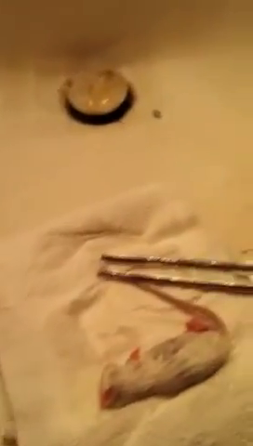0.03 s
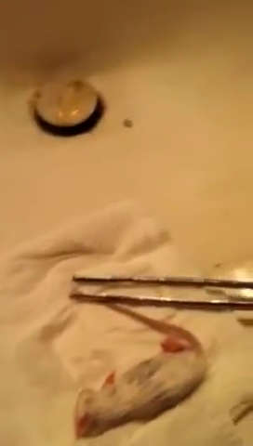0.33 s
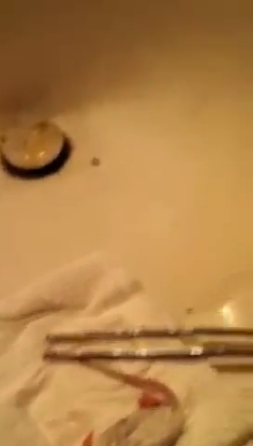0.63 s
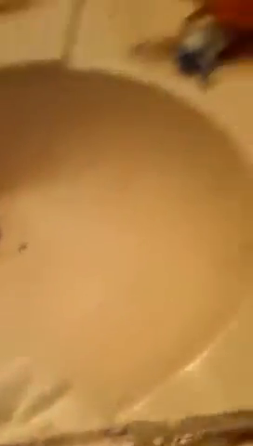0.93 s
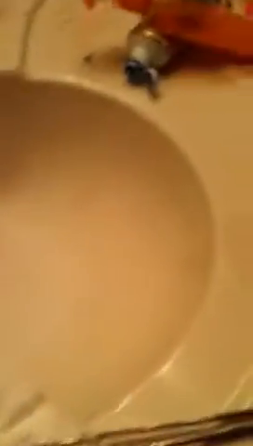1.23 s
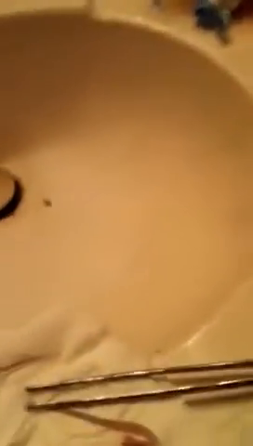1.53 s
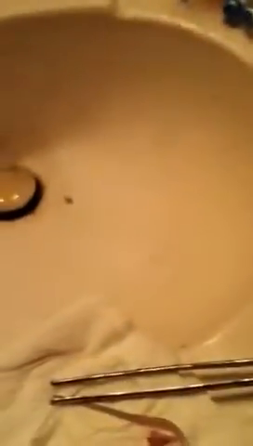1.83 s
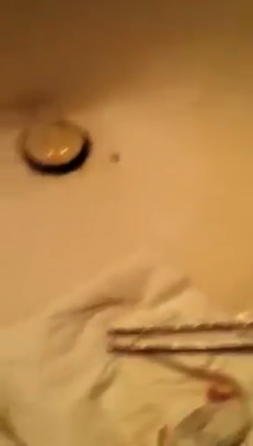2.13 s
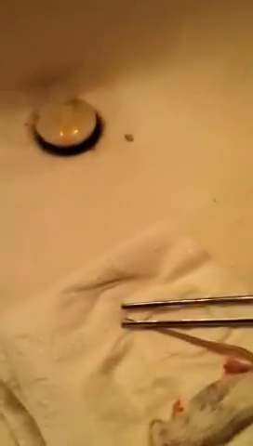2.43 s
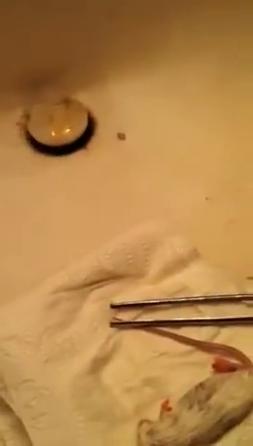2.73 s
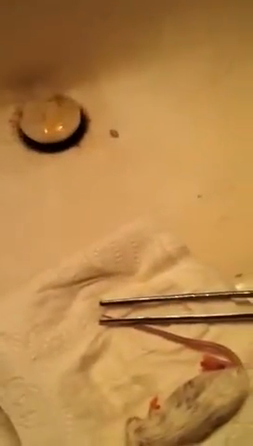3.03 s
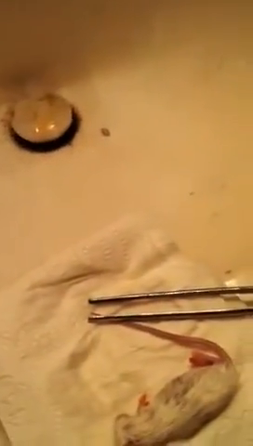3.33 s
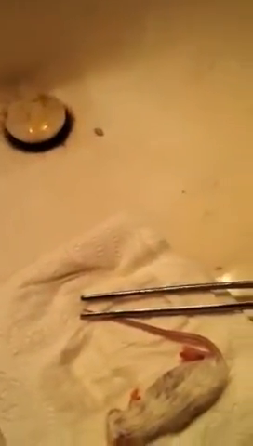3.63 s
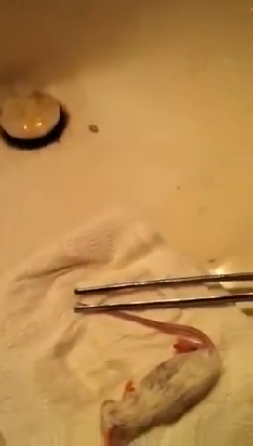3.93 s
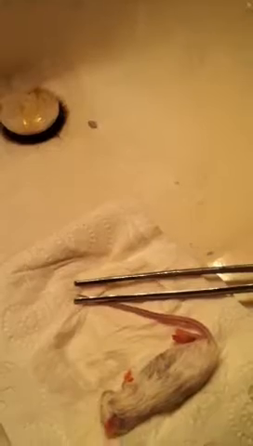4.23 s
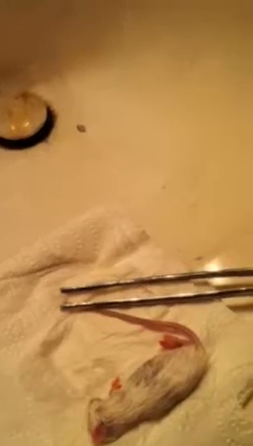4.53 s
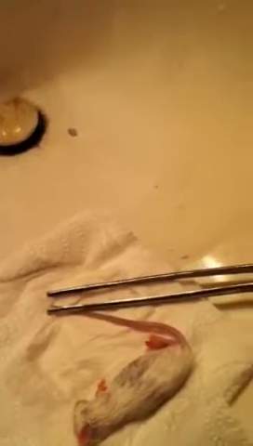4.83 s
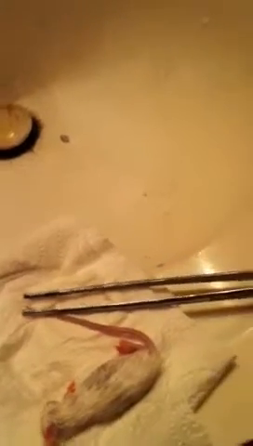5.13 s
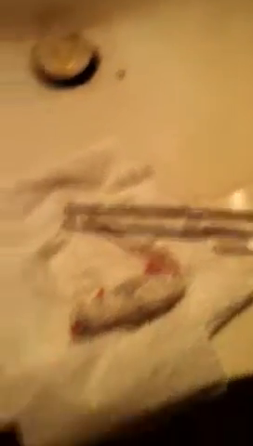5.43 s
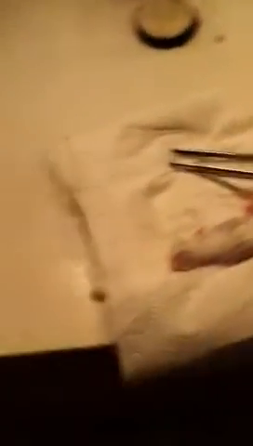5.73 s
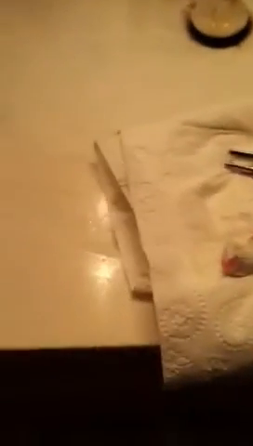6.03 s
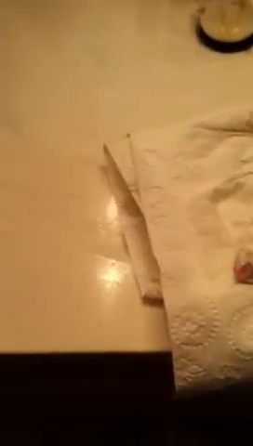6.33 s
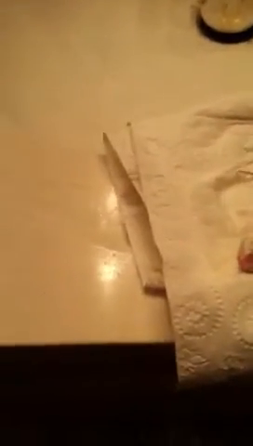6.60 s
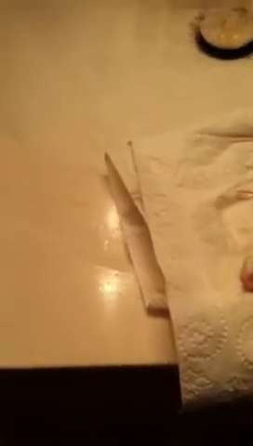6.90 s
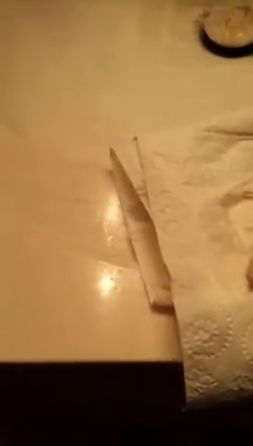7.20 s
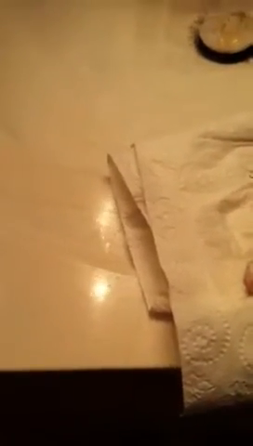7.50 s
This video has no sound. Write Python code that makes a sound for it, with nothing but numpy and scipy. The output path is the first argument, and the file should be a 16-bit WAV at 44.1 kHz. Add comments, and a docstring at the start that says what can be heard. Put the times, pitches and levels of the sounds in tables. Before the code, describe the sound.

Metal clanking on a sink, followed by sharp wooden cabinet knocks, a door slam with softer rebounds, and faint ticks over low hum.

```python
"""A small, hard-walled room with faint ventilation hum and microphone hiss. First a metal tool clanks
on a washbasin. At 1.1 s and 3.1 s a wooden cabinet's door is bumped: the panels ring and the struck
spot clacks. The first bump rebounds lightly; thin peeps, tiny ticks and a rustle sound in the gaps.
At 4.2 s the door slams, then rebounds in softer knocks. Last come a small tap, one tick and a faint,
brief high rustle, then two more soft rustles."""
import sys
import numpy as np
from scipy import signal
from scipy.io import wavfile
from scipy.ndimage import uniform_filter1d

SR = 44100
rng = np.random.default_rng(int(sys.argv[2]) if len(sys.argv) > 2 else 0)


def int16_out(signal):
    """Quantize to a 16-bit WAV file."""
    q = np.round(np.clip(np.atleast_2d(signal).T, -1, 1) * 32767)
    wavfile.write(sys.argv[1], SR, q.astype(np.int16))


N = 337806
AGE_S = np.arange(int(.8 * SR)) / SR   # time axis of one event
EDGES_HZ = np.geomspace(25, 16500, 25)
CENTRES_HZ = np.sqrt(EDGES_HZ[1:] * EDGES_HZ[:-1])
BANDS = [signal.butter(2, pair, "band", fs=SR, output="sos") for pair in zip(EDGES_HZ, EDGES_HZ[1:])]


def from_db(db):
    """Decibels to gain."""
    return 10 ** (np.asarray(db) / 20)


def unit_rms(x):
    """Scale to rms 1."""
    return x / np.sqrt(np.mean(x ** 2) + 1e-20)


def at_hz(points, hz):
    """Interpolate a table over log frequency."""
    freqs, values = np.transpose(points)
    return np.interp(np.log(hz), np.log(freqs), values)


def decay(t60_s):
    """Envelope falling 60 dB in t60_s."""
    return np.exp(-np.log(1000) * AGE_S / t60_s)


def add(track, time_s, sound):
    """Mix a sound into the track."""
    start = max(0, round(time_s * SR))
    track[start:start + len(sound)] += sound[:N - start]


def resonate(x, hz, *widths_hz):
    """Two-pole resonators in series, one per width, each with peak gain 1."""
    for width_hz in widths_hz:
        r = np.exp(-np.pi * width_hz / SR)
        feedback = [1, -2 * r * np.cos(2 * np.pi * hz / SR), r * r]
        x = signal.lfilter(np.array([1, 0, -1]) * (1 - r * r) / 2, feedback, x)
    return x


def ring(modes, scatter_db):
    """One row per mode: a decaying sine of random phase and scattered level."""
    return np.array([from_db(db + scatter_db * rng.standard_normal()) * decay(t60_s)
                     * np.sin(2 * np.pi * (hz * AGE_S + rng.random())) for hz, db, t60_s in modes])


# air noise and hiss: (frequency [Hz], relative density [dB])
AIR_SPECTRUM = [(18, -73), (30, -42), (90, -27), (111, -11), (145, -10), (174, -6), (203, -20.5),
                (226, -9.5), (335, -7), (392, -7.5), (496, -12), (931, -14), (1030, -15.5), (3940, -24.5),
                (15800, -30.5)]
# ventilation lines: (frequency [Hz], level [dB], resonator width [Hz])
HUM_LINES = [(173.2, -72.5, 12.3), (400.1, -72, 11.8), (312.3, -82, 9), (119.5, -78.5, 4.8)]


def background(air_db=-63.2, rumble_cut_hz=70, fan_hz=172.2, fan_db=-71):
    """Steady air noise and hiss, narrow wavering ventilation lines and the fan's tone."""
    white = rng.standard_normal((2, N))
    air = sum(from_db(at_hz(AIR_SPECTRUM, hz)) * signal.sosfilt(band, white[k % 2])
              for k, (band, hz) in enumerate(zip(BANDS, CENTRES_HZ)))
    air = signal.sosfilt(signal.butter(1, rumble_cut_hz, "high", fs=SR, output="sos"), air)
    hum = sum(from_db(db) * unit_rms(resonate(rng.standard_normal(N), hz, width_hz, width_hz))
              for hz, db, width_hz in HUM_LINES)
    fan = from_db(fan_db) * unit_rms(np.sin(2 * np.pi * fan_hz * np.arange(N) / SR))
    return from_db(air_db) * unit_rms(air) + hum + fan


# faint peeps: (time [s], length before stretch [s], level [dB], pitch [Hz])
PEEP_EVENTS = [(0.475, 0.086, -65, 1080), (0.74, 0.17, -66.5, 513), (2.795, 0.082, -69, 2573),
               (3.308, .082, -65.5, 1070), (3.405, 0.035, -63.5, 1050), (3.495, 0.043, -67.5, 1048),
               (3.701, 0.039, -66, 1057), (3.885, 0.064, -71.5, 1110)]


def peeps(track, stretch=1.3, waver=0.0059):
    """Thin, slightly wavering tones that swell and fade."""
    for time_s, length_s, db, hz in PEEP_EVENTS:
        envelope = np.sin(np.pi * np.minimum(AGE_S / (stretch * length_s), 1))
        wobble = unit_rms(uniform_filter1d(rng.standard_normal(len(AGE_S)), size=600))
        tone = np.sin(2 * np.pi * np.cumsum(hz * (1 + waver * wobble)) / SR)
        add(track, time_s, from_db(db) * envelope * unit_rms(tone))


# faint rustles: (time [s], length [s], level [dB])
RUSTLE_EVENTS = [(3.53, 0.11, -69.5), (7.29, 0.11, -74), (7.41, 0.083, -70.5)]


def rustles(track, hz=6600, width_hz=1800):
    """Soft brushes of high noise that swell and fade."""
    for time_s, length_s, db in RUSTLE_EVENTS:
        envelope = np.sin(np.pi * np.minimum(AGE_S / length_s, 1))
        hiss = resonate(rng.standard_normal(len(AGE_S)), hz, width_hz, 2 * width_hz)
        add(track, time_s, from_db(db) * envelope * unit_rms(hiss))


def burst(hz, decay_ms, width_hz=4500, room_db=-21, room_t60_s=0.27):
    """Decaying band noise with a room tail: a tick or tap if short, a rustle if slower."""
    envelope = np.hypot(np.exp(-AGE_S * 1000 / decay_ms), from_db(room_db) * decay(room_t60_s))
    noise = resonate(rng.standard_normal(len(AGE_S)), hz, width_hz, 2 * width_hz)
    return envelope * unit_rms(noise)


# four ticks, then a faint, brief high rustle: (time [s], level [dB], centre [Hz], 1/e decay [ms])
BURST_EVENTS = [(1.179, -39.5, 7250, 0.77), (3.640, -59, 6800, 9.0), (4.419, -51, 8000, 2.5),
                (6.736, -43, 13800, 4.5), (6.938, -67, 10900, 37)]


def small_contacts(track, tap_s=6.397, tap_db=-49.5):
    """Bright ticks, a brief rustle, and the duller tap of something small set down."""
    for time_s, db, hz, decay_ms in BURST_EVENTS:
        add(track, time_s, from_db(db) * burst(hz, decay_ms))
    tap = burst(hz=1010, decay_ms=7.9, width_hz=690, room_db=-7.5, room_t60_s=0.24)
    add(track, tap_s, from_db(tap_db) * tap)


def seating(build_ms):
    """Contact force grows quadratically until the parts are seated."""
    return np.minimum(AGE_S * 1000 / max(build_ms, .3), 1) ** 2


# room decay: (frequency [Hz], t60 [s])
ROOM_T60 = [(50, 0.083), (130, 0.56), (500, 0.38), (1500, 0.29), (4000, 0.25), (8000, 0.25), (15000, .19)]


def wash(gains, build_ms, crack_db, crack_t60_s, grit_db=7.0):
    """Dense modes as band noise: a short crack, then the room's tail, shorter in the treble."""
    # uneven onset: separate contacts and reflections from near walls
    flutter = unit_rms(uniform_filter1d(rng.standard_normal(len(AGE_S)), size=24))
    crack = from_db(crack_db) * decay(crack_t60_s) * unit_rms(from_db(grit_db * flutter))
    white = rng.standard_normal((2, len(AGE_S))) * seating(build_ms)
    return sum(gain * signal.sosfilt(band, white[k % 2] * np.hypot(crack, decay(at_hz(ROOM_T60, hz))))
               for k, (band, hz, gain) in enumerate(zip(BANDS, CENTRES_HZ, gains)))


# tool's ring: (frequency [Hz], relative level [dB], t60 [s])
TOOL_MODES = [(392.4, -5, 0.32), (841, -6.5, 0.33), (1386, -4, .27), (1398, -4, 0.33), (2760, 9.5, 0.053),
              (3820, -3, 0.16), (4120, -3, 0.14), (5560, -2, 0.18), (8205, -0.5, .19), (11200, -3.5, 0.16),
              (12680, -13, 0.18), (15000, -14, .19)]
# crash on the basin: (frequency [Hz], relative density [dB])
CRASH_SPECTRUM = [(30, -29), (150, -24), (280, -7), (400, -8), (650, -8.5), (1300, 0), (1900, -10),
                  (2800, -3), (4000, -8.5), (6500, -12), (10000, -17.5), (15000, -29)]
# landing and bounce: (time [s], crash gain [dB], ring gain [dB])
CLANK_EVENTS = [(0.000, -25.5, -40.5), (0.030, -32.5, -47.5)]


def tool_clanks(track):
    """Metal hits the hard basin: a bright crash plus the tool's own ring."""
    for time_s, crash_db, ring_db in CLANK_EVENTS:
        gains = from_db(at_hz(CRASH_SPECTRUM, CENTRES_HZ) + crash_db)
        crash = wash(gains, build_ms=0.52, crack_db=-6.0, crack_t60_s=0.043)
        ringing = from_db(ring_db) * ring(TOOL_MODES, scatter_db=0).sum(axis=0)
        add(track, time_s, crash + ringing)


def blow_colour(hz, bass_db, tilt_db_oct, bass_hz=190, bass_octaves=1.37, treble_hz=1000):
    """Gain at hz: a bump on the carcass's low modes and a treble tilt for the contact's softness."""
    bass = np.exp(-(np.log2(hz / bass_hz) / bass_octaves) ** 2)
    treble_octaves = np.log2(1 + (hz / treble_hz) ** 2) / 2
    return from_db(bass_db * bass + tilt_db_oct * treble_octaves)


# strongest cabinet modes: (frequency [Hz], relative level [dB], t60 [s])
CABINET_MODES = [(121, -12, .4), (135, -5, .37), (173, -14, .4), (224, -2, .42), (240, -6, .35),
                 (311, 0, .38), (345, -4, .36), (359, -4, .42), (452, -6, .4), (495, -6, .37),
                 (515, -3, .38), (610, -1, .4), (630, -6, .38), (668, -6, .3), (700, -6, .3),
                 (758, -5, .35), (870, -4, .28), (910, -6, .28), (1006, 1, .18), (1057, -3, .28),
                 (1125, -6, .26), (1199, -6, .28), (1311, -6, .27), (1373, -8, .22), (1437, -7, .2),
                 (1485, -9, .32), (1575, -8, .3), (2283, -7, .13), (2745, -9, .2)]
# dense panel modes: (frequency [Hz], relative density [dB])
PANEL_SPECTRUM = [(30, -15), (65, -21), (95, -35.5), (135, -3), (220, -8), (330, 0.5), (550, -5.5),
                  (1000, -2), (1600, -2.5), (2700, -5), (4500, -9.5), (7000, -14), (11000, -14.5),
                  (15500, -15.5)]


def cabinet(bass_db, tilt_db_oct, build_ms, panels_db=-4.0, modes_db=-27.5):
    """The struck cabinet: a wash of dense panel modes plus the clear, strong ones."""
    panel_gains = from_db(at_hz(PANEL_SPECTRUM, CENTRES_HZ) + panels_db)
    panel_gains *= blow_colour(CENTRES_HZ, bass_db, tilt_db_oct)
    mode_gains = from_db(modes_db) * blow_colour(np.array(CABINET_MODES)[:, 0], bass_db, tilt_db_oct)
    modes = mode_gains @ ring(CABINET_MODES, scatter_db=1.2)
    return wash(panel_gains, build_ms, crack_db=4.0, crack_t60_s=0.075) + seating(build_ms) * modes


# struck spot: (pitch multiple [ratio], resonator width [Hz], relative level [dB])
CLACK_RESONANCES = [(1, 182, 8.5), (1.32, 360, -4.5), (2.8, 703.4, -9.5)]


def clack(pitch_hz, tilt_db_oct, build_ms, rattle_db=-39, room_db=-12, ring_db=-28, ring_cycles=280):
    """The struck spot rattles briefly in broad resonances; the lowest rings on."""
    envelope = seating(build_ms) * np.hypot(decay(t60_s=0.041), from_db(room_db) * decay(t60_s=0.28))
    contact = rng.standard_normal(len(AGE_S)) * envelope
    rattle = 0
    for multiple, width_hz, db in CLACK_RESONANCES:
        hz = multiple * pitch_hz
        resonance = unit_rms(resonate(contact, hz, width_hz, 4 * width_hz))
        rattle += from_db(db) * blow_colour(hz, 0, tilt_db_oct / 2) * resonance
    # equal loss per cycle: low notes last longer
    note = np.sin(2 * np.pi * pitch_hz * AGE_S) * decay(ring_cycles / pitch_hz) * seating(build_ms)
    return from_db(rattle_db) * unit_rms(rattle) + from_db(ring_db) * note


def blow(force_db, bass_db, tilt_db_oct, clack_db, clack_hz):
    """Cabinet and struck spot sound together; a harder blow takes longer to seat."""
    build_ms = 8.2 * from_db(0.63 * force_db)   # 0 dB: a full slam
    body = cabinet(bass_db, tilt_db_oct, build_ms)
    spot = from_db(clack_db) * clack(clack_hz, tilt_db_oct, build_ms)
    return from_db(force_db) * (body + spot)


# door swings back and settles: (time [s], force [dB], tilt above 1 kHz [dB/octave])
REBOUND_EVENTS = [(1.272, -35, -9), (1.341, -32.5, -5), (1.46, -39, -7.5), (4.419, -31, -5.5),
                  (4.436, -23.5, -5.5), (4.576, -30, -17.5), (4.757, -39, -16)]


def door_rebounds(track, slam_thump_db=-12, thump_per_db=0.41):
    """The free door lands on one spot of its edge; the rocking carcass's thump fades more slowly."""
    for time_s, force_db, tilt_db_oct in REBOUND_EVENTS:
        thump_db = slam_thump_db + thump_per_db * force_db
        add(track, time_s, blow(force_db, thump_db - force_db, tilt_db_oct, clack_db=-3, clack_hz=1066))


# door pushed against the cabinet: (time [s], force [dB], clack pitch [Hz])
PUSH_EVENTS = [ (1.052, -35, 1120), (1.06, -26.5, 1170), (1.114, -16.5, 632), (1.135, -29, 1105),
               (1.193, -28.5, 626), (3.026, -26, 593), (3.037, -26.5, 438), (3.069, -8.5, 440.8),
               (4.191, 0.5, 512.6), ]


def door_pushes(track, bass_db=-1, tilt_per_db=0.29, slam_clack_db=-4, clack_loss_per_db=0.2549):
    """Driven blows: the lighter, the duller, and the more the clack stands out."""
    for time_s, force_db, clack_hz in PUSH_EVENTS:
        clack_db = slam_clack_db - clack_loss_per_db * force_db
        add(track, time_s, blow(force_db, bass_db, tilt_per_db * force_db, clack_db, clack_hz))


def scene():
    """Mono mix of tool, door and small sounds over the background."""
    track = background()
    tool_clanks(track)
    door_pushes(track)
    door_rebounds(track)
    small_contacts(track)
    peeps(track)
    rustles(track)
    return track[None]


def record(dry, cutoff_hz=15900):
    """Steep elliptic low-pass."""
    return signal.sosfilt(signal.ellip(12, .1, 90, cutoff_hz, fs=SR, output="sos"), dry)


dry = scene()
out = record(dry)
int16_out(out)
```